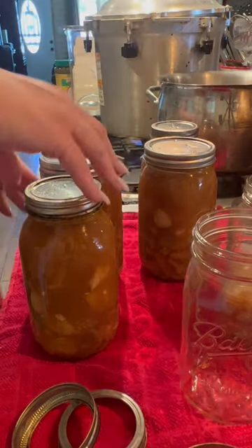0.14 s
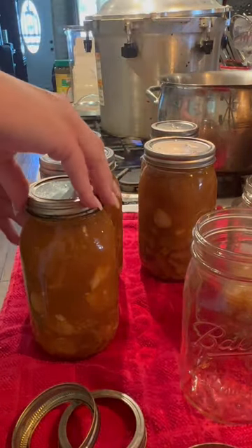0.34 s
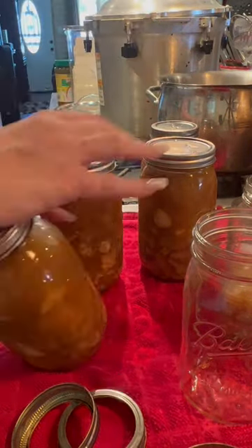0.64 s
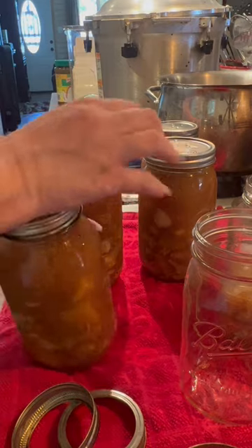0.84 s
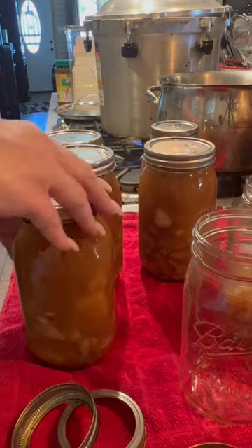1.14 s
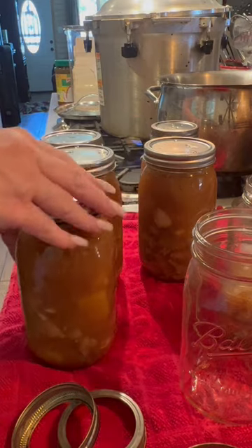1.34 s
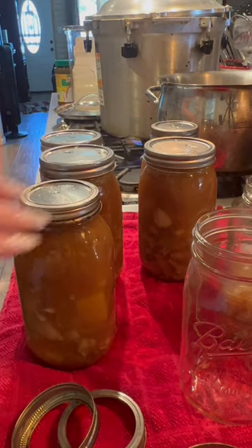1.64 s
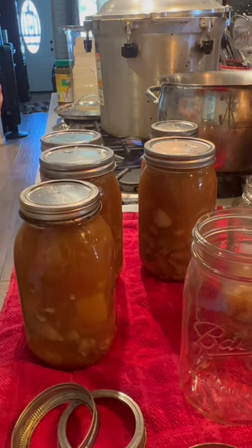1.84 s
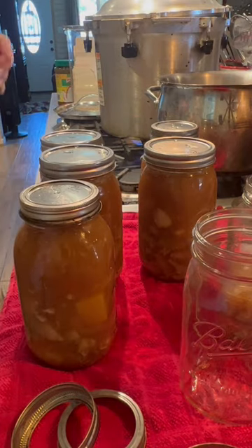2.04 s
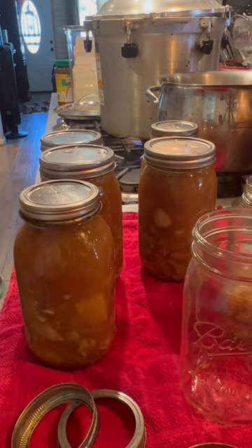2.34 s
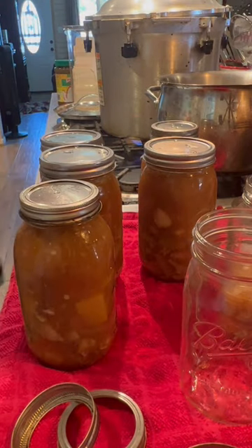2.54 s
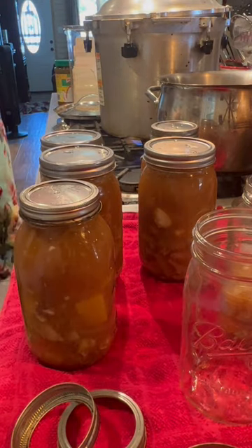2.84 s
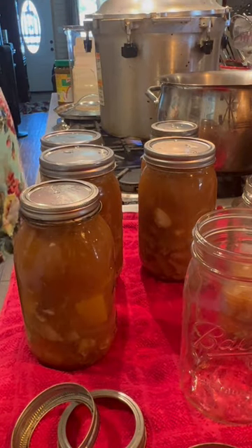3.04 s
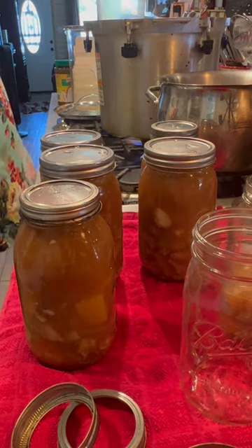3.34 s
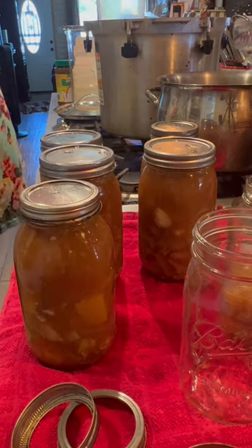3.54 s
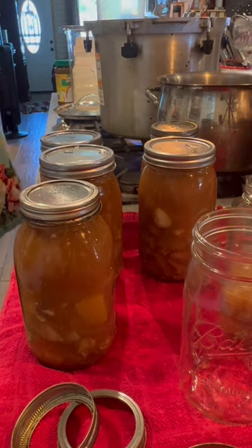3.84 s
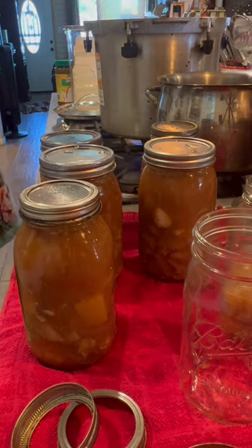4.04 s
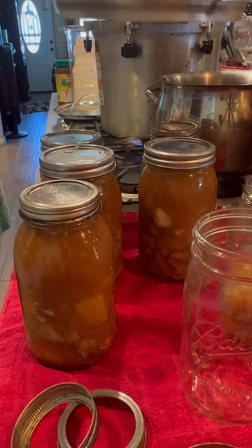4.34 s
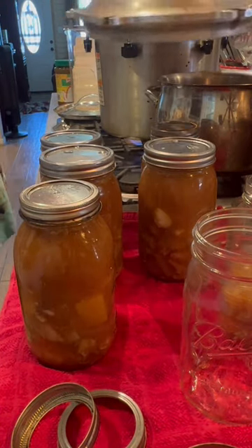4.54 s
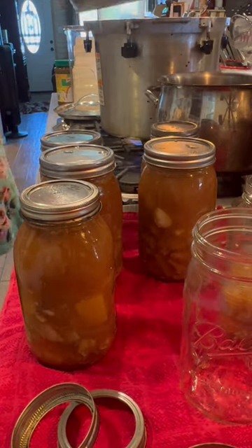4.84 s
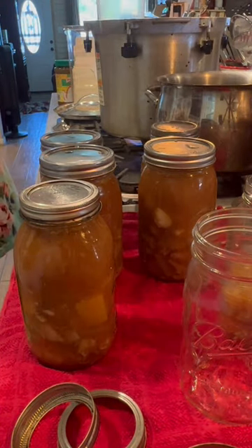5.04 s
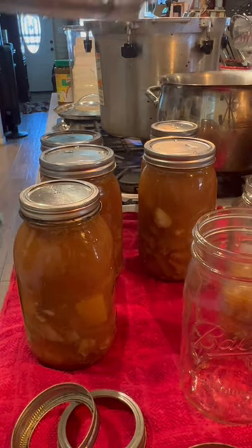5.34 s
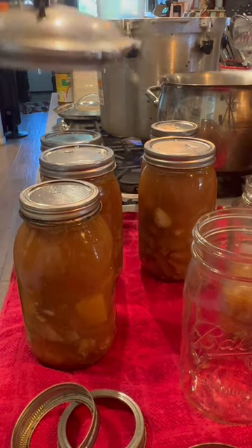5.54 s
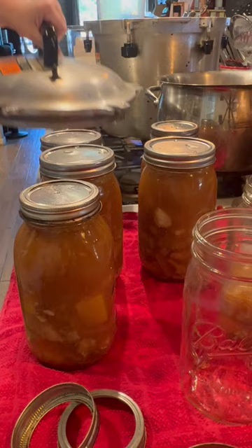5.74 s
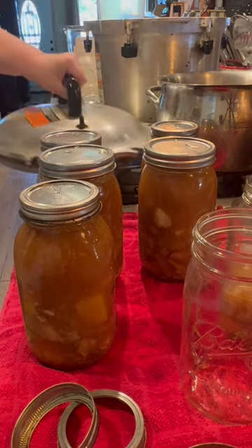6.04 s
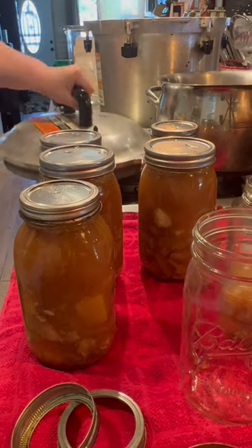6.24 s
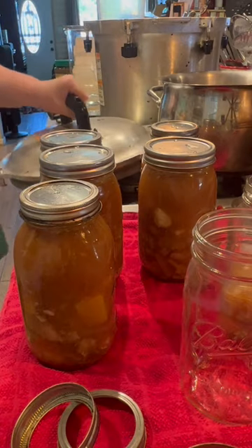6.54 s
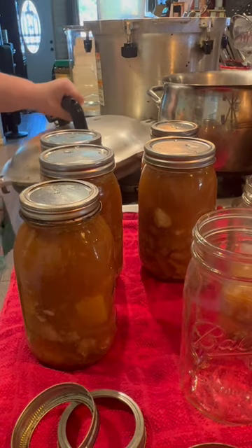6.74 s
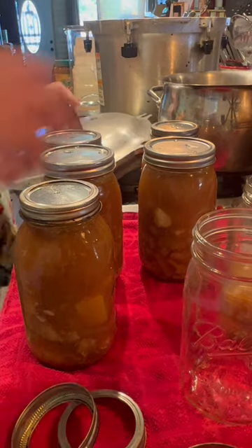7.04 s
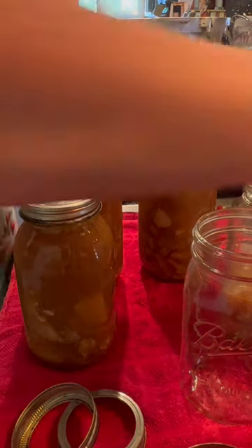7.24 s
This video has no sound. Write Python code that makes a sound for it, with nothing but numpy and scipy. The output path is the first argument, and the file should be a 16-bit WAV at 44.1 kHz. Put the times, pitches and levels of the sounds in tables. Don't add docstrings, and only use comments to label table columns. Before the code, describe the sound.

Close by, fingernails tick sharply on metal jar lids while cloth rustles and a full glass jar is nudged. After soft scuffs, a large pot lid comes loose with a low boom, clangs against a rim with quick bounces, then lands rocking and clattering on the stove grate. A low, pulsing motor hum runs beneath, picked up by a phone in a home kitchen.

```python
import sys
import numpy as np
from scipy import signal
from scipy.fft import rfft, irfft, next_fast_len
from scipy.io import wavfile
from scipy.ndimage import uniform_filter1d

SR = 44100
rng = np.random.default_rng(int(sys.argv[2]) if len(sys.argv) > 2 else 0)


def waveform_to_disk(signal):
    frames = np.transpose(np.atleast_2d(signal))
    scaled = np.clip(frames, -1, 1) * 32767
    samples = np.round(scaled).astype(np.int16)
    wavfile.write(sys.argv[1], SR, samples)


def level_to_linear(level):
    exponent = np.asarray(level, float) / 20
    return 10 ** exponent


N = 326323

# pitch_hz [Hz], side_minus_mid_db [dB]
SIDE_NEAR = [(60, -33), (110, -27.5), (200, -21.5), (380, -9), (700, 0), (1290, -4), (2380, -7.5),
             (4400, -4), (8120, -0.5), (15000, -3)]
DELAYED_NEAR = 0.62


def evened(x):
    return x / np.sqrt(np.mean(x ** 2) + 1e-20)


def read(points, hz):
    f, value = np.transpose(points)
    return np.interp(np.log(hz + 1), np.log(f + 1), value)


def add(mix, s, sound):
    part = mix[..., round(s * SR):][..., :sound.shape[-1]]
    part += sound[..., :part.shape[-1]]


def ports(x, other, side, delayed):
    hz = np.fft.rfftfreq(len(x), 1 / SR)
    delayed = np.clip(delayed, 0, 1)
    difference = -1j * delayed * rfft(x) + np.sqrt(1 - delayed ** 2) * rfft(other)
    apart = level_to_linear(read(side, hz)) * difference
    return x + np.array([[1], [-1]]) * irfft(apart, len(x))


def hum():
    # pitch_hz [Hz], level_db [dB rms]
    motor_tones = [
        (57.0, -46.5),
        (58.72, -46.2),
        (120.0, -56),
        (242.0, -66),
    ]
    t = np.arange(N) / SR - 0.555
    total = np.zeros(N)
    for k, (hz, db) in enumerate(motor_tones):
        total += (-1) ** k * level_to_linear(db) * np.sqrt(2) * np.sin(2 * np.pi * hz * t)
    return total


def hush():
    # pitch_hz [Hz], level_db [dB per Hz]
    room_colour = [(15, -38), (25, -17), (36, 0), (64, -3.5), (86, 1.5), (126, 7), (164, -7), (322, -12),
                   (389, -16.5), (684, -19.5), (782, -17), (2490, -32), (3440, -37.5), (5010, -34.5),
                   (15500, -65.5)]
    # pitch_hz [Hz], width_hz [Hz], level_db [dB]
    fan_whines = [(2481.4, 370, -74), (5030, 480, -84), (8976, 100, -97), (12200, 300, -99),
                  (677, 40, -69.5), (505.6, 120, -67)]
    # pitch_hz [Hz], side_minus_mid_db [dB]
    side_far = [(60, -28.5), (120, -19), (240, -14.5), (480, -7.5), (950, 0.5), (1890, -8.5), (3770, -4.5),
                (7520, -4), (15000, 2)]
    size = next_fast_len(N, True)
    hz = np.fft.rfftfreq(size, 1 / SR)
    colour = level_to_linear(-49) * evened(level_to_linear(read(room_colour, hz)))
    for f, width, db in fan_whines:
        colour = colour + level_to_linear(db) * evened(1 / (1 + ((hz - f) / width * 2) ** 2))
    air = irfft(rfft(rng.standard_normal((2, size))) * colour, size)
    return ports(*air, side_far, 0.45)[:, :N]


def rub(s, rise, hold, fade, level_db, dull_db):
    start = max(s - 2 * rise, 0)
    size = 1024 * int((s - start + hold + 2 * fade) * SR / 1024 + 2)
    t, hz = start + np.arange(size) / SR, np.fft.rfftfreq(size, 1 / SR)
    tilt = level_to_linear(dull_db * np.log2((hz + 300) / 6000))
    tilt = tilt * (hz / (hz + 1600)) ** 2 / (1 + (hz / 14800) ** 6)
    tilt /= np.sqrt(np.mean(tilt[(hz > 3400) & (hz < 15000)] ** 2))
    swell_db = -20 * np.maximum(s - t, 0) / rise
    fade_db = -20 * np.maximum(t - s - hold, 0) / fade
    pressure = level_to_linear(level_db + swell_db + fade_db)
    own_rng = np.random.default_rng(rng.integers(2 ** 31))
    hiss, other, when, strength = own_rng.standard_normal((size, 4)).T
    slips = (when > 2.9) * 0.734 * abs(strength)
    crackle = 1 + signal.lfilter([1], [1, -.985], slips)
    pair = 0.519 * irfft(rfft(np.array([hiss, other])) * tilt, size) * pressure * crackle
    return start, ports(*pair, SIDE_NEAR, DELAYED_NEAR)


def cloth_scuffs(mix):
    scuffs = [(.02, -74.5, 0.97, 3), (.34, -54.5, 0.0259, -2), (.434, -38.5, 0.0714, -3),
              (.474, -33, 0.0255, -1), (.832, -69, 0.4, -9.5), (.9, -64.5, -0.01, -7),
              (1.048, -56.5, 0.04, -0.5), (1.206, -63, 0.28, -3), (1.236, -47.5, 0.245, -8),
              (1.97, -51, 0.19, -10), (2.156, -49, 0.0326, -1), (2.182, -45.5, 0.1471, -8.5),
              (2.418, -60.5, 0.12, -7), (3.084, -57.5, 0.3151, -12)]
    for s, level_db, fade, dull_db in scuffs:
        add(mix, *rub(s, 0.008, 0, fade, level_db, dull_db))


def cloth_sweeps(mix):
    sweeps = [
        (.5, .25, -56.5, -8),
        (1.55, 0.117, -66.5, -9.5),
        (1.85, 0.035, -53, -10),
        (2.582, 0.022, -62.5, -10),
        (2.89, 0.137, -51.5, -9),
        (5.664, 0.086, -55, -9.5),
        (7.356, .04, -60.5, -9),
    ]
    for s, hold, level_db, dull_db in sweeps:
        add(mix, *rub(s, 0.16, hold, 0.11, level_db, dull_db))


def tick(s, peak_db, hz, breadth, t60):
    t, f = np.arange(6000) / SR, np.fft.rfftfreq(8192, 1 / SR)
    fading = level_to_linear(-60 * t / t60) + level_to_linear(-17.5 - 60 * t / 0.182)
    burst = rng.standard_normal((2, 6000)) * fading
    bell = (1 + 1j * (f / hz - hz / (f + 1)) / max(breadth, .03)) ** -2
    burst = irfft(rfft(burst, 8192) * bell, 8192)[:, :6000]
    return s, level_to_linear(peak_db - 7.5) * ports(*burst, SIDE_NEAR, DELAYED_NEAR) / abs(burst[0]).max()


def nail_ticks(mix):
    nail_taps = [(0.3386, -34.5, 5000, 0.58), (0.4323, -23, 3760, 0.94), (0.448, -21, 3610, 0.86),
                 (0.4688, -12.5, 5330, 1), (0.5867, -37, 11570, 0.41), (0.8305, -39.5, 6640, 0.19),
                 (0.8954, -42, 7590, 0.162), (0.954, -45, 4060, 0.39), (1.048, -44, 7600, 0.66),
                 (1.2052, -38.5, 4940, 0.68), (2.155, -37.5, 8310, 0.99), (5.658, -40, 7200, 0.46),
                 (7.3397, -39.5, 6460, 0.487)]
    for row in nail_taps:
        add(mix, *tick(*row, 0.0157))


def dull_knocks(mix):
    soft_contacts = [(0.4329, -21, 2800, 0.5), (0.623, -46, 1440, 0.38), (0.6823, -38.5, 1130, 0.34),
                     (0.854, -45, 2940, 0.14), (0.8975, -46, 3255, 0.15), (1.2825, -33.5, 1830, 0.23),
                     (1.802, -34.5, 2110, 0.3), (1.9664, -39, 2880, 0.3), (2.034, -40, 1400, 0.29),
                     (2.796, -38, 2500, 0.42), (6.929, -31.5, 1200, 0.39), (7.293, -32, 1067, 0.83)]
    for row in soft_contacts:
        add(mix, *tick(*row, 0.027))


def noise(size, magnitude):
    frames = size // 64 + 5
    hz, t = np.fft.rfftfreq(256, 1 / SR)[:, None], np.arange(frames) * 64 / SR
    a, b = rng.standard_normal((frames, 129, 2), dtype=np.float32).T
    spectra = (a + 1j * b) * magnitude(hz, t).astype(np.float32)
    return signal.istft(spectra, nperseg=256, noverlap=192)[1][:size]


def blow(row, modes_hz, modes, crowd_db, beat, dull, treble_db):
    # pitch_hz [Hz], t60_s [s]
    crowd_decay = [(60, 0.25), (150, 0.655), (400, 0.468), (1500, 0.5395), (4000, 0.4976), (8000, 0.33),
                   (14000, 0.083)]
    # pitch_hz [Hz], steepness [power]
    band_edges = ((220, 14), (720, 5), (3900, 14))
    s, thud_db, body_db, edge_db, ring = row
    size = 24576
    t, hz = np.arange(size) / SR, np.fft.rfftfreq(size, 1 / SR)
    db, t60, rise = np.transpose(modes)[:, :, None].astype(np.float32)
    age = t.astype(np.float32)
    draws = rng.random((len(modes), 1, 4), dtype=np.float32)
    start, twin, twin_start, spot = draws.transpose(2, 0, 1)
    brief = np.minimum(0.33 / t60, 1) ** 2
    throb = 1 + beat * brief * np.cos(2 * np.pi * ((8 + 35 * twin) * age + twin_start))
    decay = np.exp(-np.float32(np.log(1000)) * age / (ring * t60))
    envelope = level_to_linear(db + 4.9 * spot) * decay * (1 - np.exp(-age / rise)) * throb
    turns = (np.c_[modes_hz] * (t + s) + start * brief) % 1
    clear = (envelope * np.sin(2 * np.pi * turns.astype(np.float32))).sum(axis=0)
    clear *= np.exp(-(t / 0.423) ** 5)

    def dying(h, u):
        gap = level_to_linear(-4.5 * np.exp(-(3 * np.log((h + 1) / 1200)) ** 2))
        return level_to_linear(-60 * u / (ring * read(crowd_decay, h))) * (h + 220) ** -dull * gap

    crowd = np.array([noise(size, dying), noise(size, dying)]) * (1 - np.exp(-t / 0.00197))
    bumps = np.convolve(rng.standard_normal(len(hz)), np.hanning(48), "same")
    ragged = level_to_linear(3.46 * evened(bumps))
    both = rfft(clear) * np.array([[1], [1j]]) / np.std(clear[:2000])
    both = both + level_to_linear(crowd_db) * ragged * rfft(crowd) / np.std(crowd[0, :2000])

    top_hz = 17000 * level_to_linear(0.28 * min(edge_db + treble_db + 31, 0))
    below = [0 * hz]
    for edge, steep in band_edges:
        below.append(1 / (1 + (hz / edge) ** steep))
    below.append(1 / (1 + (hz / 15400) ** 30 + (hz / top_hz) ** 6))
    out = np.zeros((2, size))
    for k, band_db in enumerate((thud_db, body_db, edge_db, edge_db + treble_db)):
        share = (below[k + 1] - below[k]) / (1 + (45 / (hz + 1)) ** 6)
        band = irfft(both * share, size)
        out += level_to_linear(band_db - 8) * band / np.std(band[0, :1500])
    out = ports(*out, SIDE_NEAR, DELAYED_NEAR) * np.minimum(t / .0012, 1)
    return s, out * signal.windows.tukey(2 * size, .15)[size:]


def jar_nudge(mix):
    nudges = [
        (1.232, -62, -51.5, -51, 0.92),
    ]
    jar_pitches = [1830, 2562, 3553, 4900, 6750, 8080, 8296, 11340]
    # level_db [dB], t60_s [s], rise_s [s]
    jar_modes = [(-3.5, 0.37, .01), (5.5, 0.395, .005), (-27, 0.14, .005), (19, 0.068, 0.00143),
                 (-2, 0.45, 0.023), (4, 0.138, 0.0025), (2, 0.51, 0.0033), (-28, 0.099, .005)]
    for row in nudges:
        add(mix, *blow(row, jar_pitches, jar_modes, crowd_db=-1.5, beat=.7, dull=.2, treble_db=13))


def squeak(s, length, start_hz, end_hz, db):
    size = int(length * SR)
    waver = evened(uniform_filter1d(rng.standard_normal(size), size=150))
    hz = np.linspace(start_hz, end_hz, size) * (1 + 0.0153 * waver)
    return s, level_to_linear(db) * np.sin(2 * np.pi * np.cumsum(hz) / SR) * np.hanning(size) * 2


def gasket_squeaks(mix):
    drags = [
        (2.865, .065, 1110, 1180, -59),
        (2.89, .05, 2950, 3050, -67),
        (2.92, .03, 3250, 3350, -68),
        (2.96, .06, 3700, 3750, -68),
        (1.83, .1, 2120, 1950, -63),
    ]
    for row in drags:
        add(mix, *squeak(*row))


def lid_lift(mix):
    tugs = [
        (3.025, -24, -39.5, -48.5, 0.205),
        (3.0445, -31.5, -25, -36.5, 0.304),
        (3.0602, -26.5, -26, -27.5, 0.757),
    ]
    pot_pitches = [63, 140, 237, 317, 600, 880, 1058, 1430, 1647, 1766, 2078]
    # level_db [dB], t60_s [s], rise_s [s]
    pot_modes = [(16.5, 0.787, 0.0192), (12, 0.448, 0.0046), (3, 0.344, 0.0034), (5.5, 0.265, 0.0083),
                 (5.5, 0.206, 0.0043), (-12.5, 0.57, 0.0033), (-10, 0.533, 0.0026), (-20, 0.15, .005),
                 (-11, 0.475, 0.015), (-13, 0.415, 0.013), (-22, 0.61, .005)]
    for row in tugs:
        add(mix, *blow(row, pot_pitches, pot_modes, crowd_db=-4.5, beat=.9, dull=1.9, treble_db=-19))


def lid_clang(mix):
    rim_hits = [
        (4.2925, -21, -6.5, -21, 0.865),
        (4.3174, -20, -16.5, -25, 0.98),
        (4.3777, -32, -24, -37, 1),
        (4.4938, -35, -28.5, -46.5, 0.74),
    ]
    lid_pitches = [58, 151, 236, 343, 493, 1129, 1492, 1815, 2702, 3970, 4500, 4834, 5184, 5640, 5809, 6514,
                   7154, 7700, 8122, 10190, 10820, 11560, 11920, 12630]
    # level_db [dB], t60_s [s], rise_s [s]
    lid_modes = [(-2, 0.16, .02), (-11.5, 0.7, 0.0086), (-5.5, 0.29, 0.0072), (4, 0.336, .004),
                 (-6, 0.93, 0.0066), (-29.5, 0.95, 0.0073), (-14, 1.965, 0.05004), (-2.5, 0.18, .003),
                 (-10.5, 0.5, .005), (-2.5, 0.34, .02), (-12.5, 0.3, 0.0038), (-8, 0.24, .01),
                 (-9, 0.12, 0.0039), (-10.5, 0.22, .005), (-16, .42, .02), (-23, 0.39, .01),
                 (-23.5, .4, .005), (-15, .23, .005), (-6, 0.17, 0.0029), (-36, 0.14, .005),
                 (-23.5, .15, 0.00524), (-14.5, .15, .005), (-16, 0.15, 0.0022), (-21.5, .18, 0.0045)]
    for row in rim_hits:
        add(mix, *blow(row, lid_pitches, lid_modes, crowd_db=-5.5, beat=.9, dull=.45, treble_db=4))


def valve_clink(mix):
    valve_hits = [
        (5.9684, -19.5, -20, -44, 0.972),
        (6.1895, -27, -29, -47.5, 0.84),
    ]
    valve_pitches = [151, 183, 260, 335, 606, 662, 910, 4090, 4310, 4628, 6379, 7316, 7763]
    # level_db [dB], t60_s [s], rise_s [s]
    valve_modes = [(-2, 1.04, 0.027), (-4, 0.764, 0.0093), (-14, 0.23, 0.0093), (-10, 0.561, 0.0036),
                   (-12, 0.442, 0.0086), (-10, 0.67, 0.0084), (-17, 1.78, 0.016), (-5.5, 0.16, 0.0018),
                   (-8.5, 0.24, 0.001), (-6, 0.179, .002), (-13.5, 0.224, 0.00188), (-16.5, 0.24, .002),
                   (-18.5, 0.14, 0.0022)]
    for row in valve_hits:
        add(mix, *blow(row, valve_pitches, valve_modes, crowd_db=-2.5, beat=.7, dull=.35, treble_db=16))


def grate_rock(mix):
    rocks = [
        (6.2422, -14.5, -17, -18, 0.847),
        (6.3009, -18, -28, -22, .99),
        (6.3848, -13.5, -14, -15.5, 0.817),
        (6.542, -18.5, -18.5, -29, 0.879),
        (6.6045, -28.5, -48, -45.5, 1),
        (6.9657, -26.5, -20.5, -38, 0.64),
    ]
    grate_pitches = [80, 145, 177, 255, 312, 404, 544, 673, 824, 1130, 1502, 1626, 1841, 2600, 3580, 4188,
                     4910]
    # level_db [dB], t60_s [s], rise_s [s]
    grate_modes = [(-7, 0.85, 0.053), (9.5, 0.463, 0.01), (-7.5, 0.917, 0.015), (-10.5, 0.447, 0.0024),
                   (-5.5, 0.403, 0.0032), (-5.5, 0.226, 0.0057), (-12, 0.17, 0.0077), (-1.5, 0.12, 0.0054),
                   (-16.5, 0.44, 0.0044), (-37.5, 0.22, 0.0087), (-12.5, 0.393, .003), (-8, 0.157, 0.0013),
                   (-9.5, 0.138, 0.0013), (-6.5, 0.087, 0.0024), (-13, 0.1, 0.0021), (-16, 0.254, 0.0051),
                   (-19, 0.1, 0.0024)]
    for row in rocks:
        add(mix, *blow(row, grate_pitches, grate_modes, crowd_db=-1.5, beat=.7, dull=1.3, treble_db=-11))


def scene():
    mix = hum() + hush()
    cloth_scuffs(mix)
    cloth_sweeps(mix)
    nail_ticks(mix)
    dull_knocks(mix)
    jar_nudge(mix)
    gasket_squeaks(mix)
    lid_lift(mix)
    lid_clang(mix)
    valve_clink(mix)
    grate_rock(mix)
    return mix


def low_pass(x):
    return signal.sosfilt(signal.butter(12, 16680, fs=SR, output="sos"), x)


def record(dry):
    return low_pass(dry)


dry = scene()
out = record(dry)
waveform_to_disk(out)
```